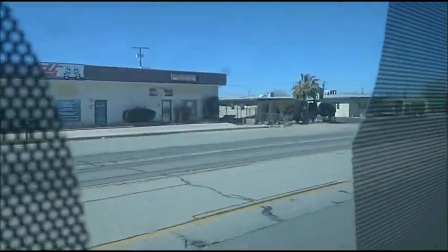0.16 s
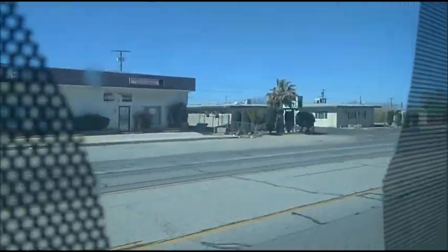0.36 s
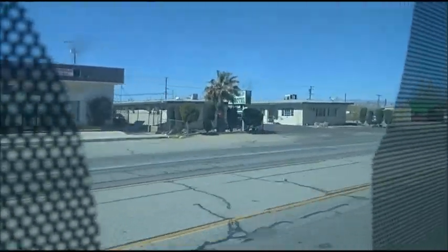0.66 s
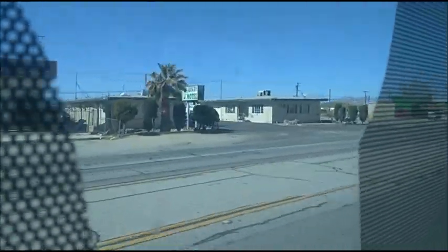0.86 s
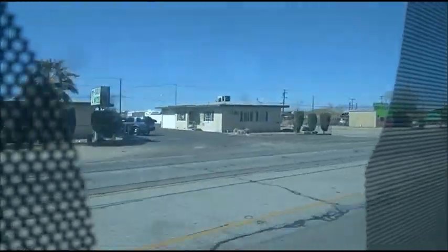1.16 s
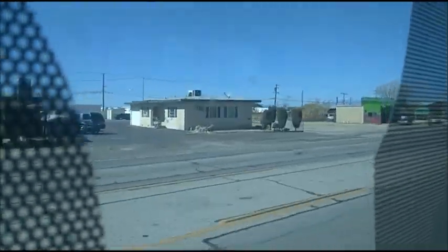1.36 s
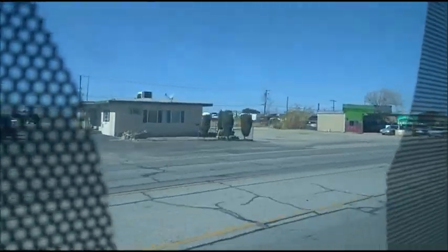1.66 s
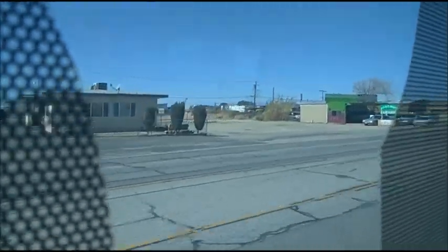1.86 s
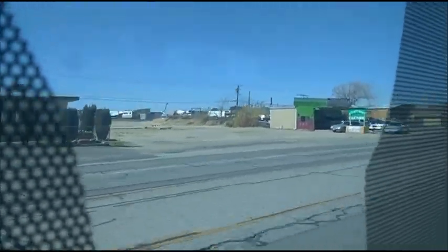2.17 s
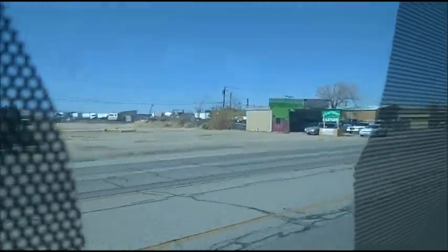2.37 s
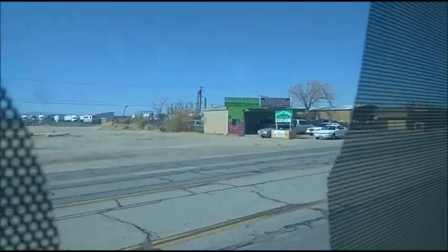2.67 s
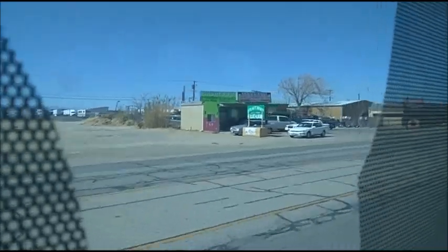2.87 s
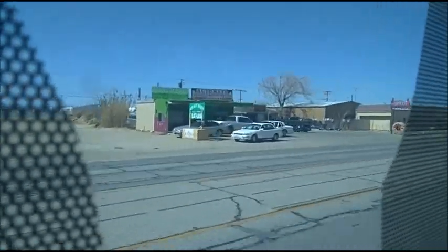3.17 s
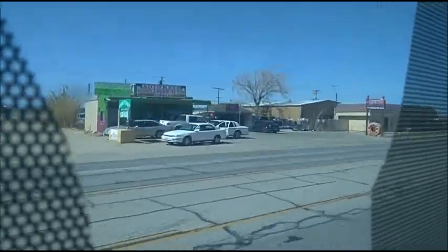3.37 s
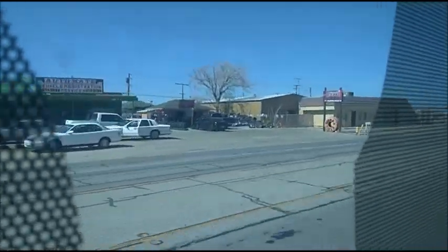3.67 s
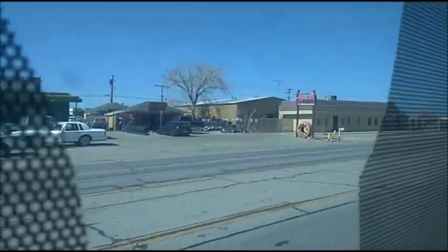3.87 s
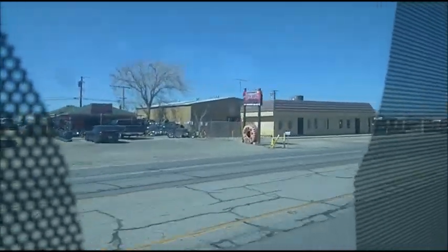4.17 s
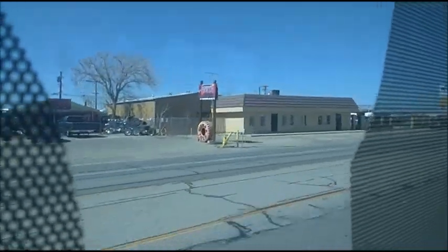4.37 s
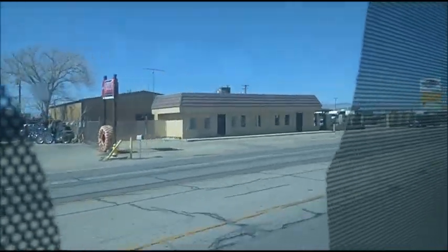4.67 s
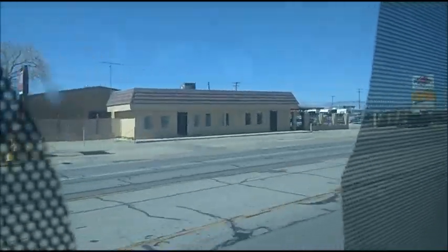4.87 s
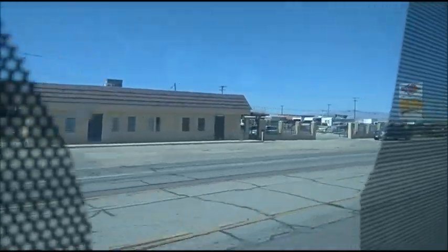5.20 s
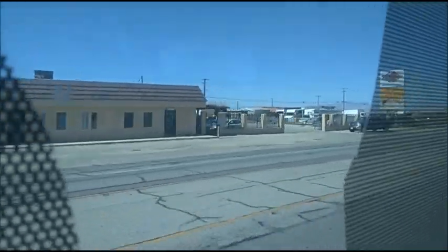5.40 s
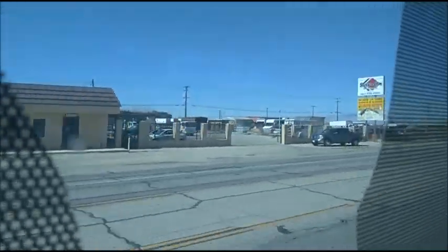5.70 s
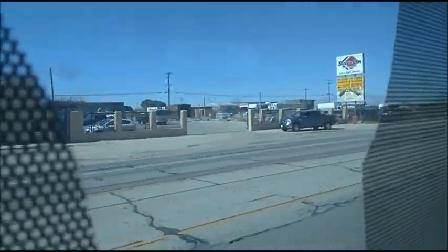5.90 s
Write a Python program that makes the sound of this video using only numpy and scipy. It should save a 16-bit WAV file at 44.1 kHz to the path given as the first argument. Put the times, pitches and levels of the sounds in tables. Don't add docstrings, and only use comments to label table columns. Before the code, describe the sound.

Steady tyre rumble and rising electric motor whine inside a moving bus, with booming bumps, rattling panels and a few sharp plastic snaps.

```python
import sys
import numpy as np
from scipy import signal
from scipy.fft import rfft, irfft, next_fast_len
from scipy.io import wavfile
from scipy.ndimage import uniform_filter1d

SR = 44100
rng = np.random.default_rng(int(sys.argv[2]) if len(sys.argv) > 2 else 0)


def pcm_store(signal):
    levels = np.round(np.clip(np.atleast_2d(signal), -1, 1) * 32767)
    wavfile.write(sys.argv[1], SR, levels.astype(np.int16).T)


def amplitude_ratio(level_db):
    exponent = np.asarray(level_db, float) / 20
    return 10 ** exponent


N = 266452
T = np.arange(N) / SR
COARSE = T[::32]


def boom():
    # time in seconds, level in dB.
    further_drops = [
        (.394, -33),
        (1.001, -26),
        (1.156, -35),
        (2.441, -22.5),
        (2.349, -30),
        (4.461, -35),
        (5.707, -22),
        (5.876, -25.5),
    ]
    pitch_hz = 68 * (1 + 0.076 * drift(30.0))
    phase = 2 * np.pi * np.cumsum(pitch_hz) / SR
    further = np.interp(T, COARSE, sum(amplitude_ratio(db) * hump(s, length=0.045) for s, db in further_drops))
    level = np.hypot(jolts(axis=1, floor_db=-38), further) * amplitude_ratio(9)
    near = np.sin(phase)
    far = amplitude_ratio(0.8) * np.sin(phase - 0.1)
    return level * np.array([near, far])


def tyres():
    # frequency in Hz, level in dB per Hz.
    rumble_spectrum = [(25, -54), (40, -99), (55, -37), (70, -49.5), (90, -42.5), (140, -48), (200, -48),
                       (250, -54), (300, -68), (450, -64.5)]
    roar_spectrum = [(300, -59.5), (450, -66), (600, -68.5), (750, -62.5), (850, -70.5), (1100, -72),
                     (1400, -76.5), (1750, -76), (2100, -83.5), (2800, -79.5), (3300, -83), (3700, -93),
                     (4200, -88.5)]
    fizz_spectrum = [(3700, -88.5), (4200, -97.5), (4800, -85.5), (5400, -91), (6500, -90.5), (7200, -92.5),
                     (8400, -93.5), (10000, -99.5), (11200, -102.5), (12500, -105.5), (14000, -111)]
    # time in seconds, level in dB.
    road_curve = [(0, -2), (.3, -2), (.6, 0.5), (.95, 0.5), (1.2, 2.5), (1.6, 2), (2.05, 1.5), (2.3, 0.5),
                  (2.6, 1), (3.0, 2), (3.3, -1), (3.65, 1.5), (4.1, 0.5), (4.5, 0), (4.8, 3), (5.1, -1),
                  (5.45, 0), (6.04, 1.5)]
    # start in seconds, peak in dB.
    shakes = [(5.877, -39), (0.3067, -54), (0.5352, -47), (0.657, -47), (0.819, -51), (0.8834, -48),
              (1.0894, -57), (1.1354, -50), (1.7619, -55), (2.1844, -50), (2.2233, -46), (3.0364, -46),
              (3.1083, -54), (3.2759, -55), (3.3473, -49), (3.7848, -47), (3.9236, -44), (4.0058, -44),
              (4.2278, -61), (4.4164, -48), (4.9327, -51), (5.2295, -56), (5.6326, -44), (5.7613, -45),
              (5.8232, -42), (6.0067, -46)]
    # time in seconds, rise over rest in dB, length in seconds.
    fizz_swells = [(.072, 6, .03), (.39, 6, 0.013), (.67, -2, .03), (.92, 1, 0.025), (1.13, 2.5, 0.1),
                   (1.55, 1.5, .06), (1.68, 6.5, 0.067), (1.9, -1, .1), (2.08, 3.5, 0.052), (2.2, 3, .03),
                   (2.49, 3, 0.072), (2.57, 4.5, 0.041), (2.75, 5, 0.062), (2.99, 4, .04), (3.8, 3.5, .03),
                   (3.91, 5.5, 0.07), (4.23, 4, 0.061), (4.34, 4, .02), (4.43, 5, 0.037), (4.56, 5.5, 0.11),
                   (4.72, 2, 0.057), (4.84, 6.5, 0.17), (5.07, 3, 0.017), (5.26, 2, 0.033), (5.62, -2, .03),
                   (5.8, 3.5, 0.074), (6.0, 4.5, 0.068)]

    road = amplitude_ratio(curve(road_curve, T, axis=1))
    rumble = port_noise(rumble_spectrum, size=2048, skirt_db=34, patchy_db=0.87, flicker_db=-0.35)
    rumble = rumble * jolts(axis=2, floor_db=-3.5) ** 0.43 * road ** 0.75 * amplitude_ratio(3.5)
    roar = port_noise(roar_spectrum, size=1024, skirt_db=31, patchy_db=1.45, flicker_db=-0.22)
    roar = roar * road * amplitude_ratio(2.5)

    fizz = port_noise(fizz_spectrum, size=256, skirt_db=26, patchy_db=1.25, flicker_db=1.2)
    shaken = np.zeros(N)
    for s, db in shakes:
        age = np.maximum(T - s, 0)
        attack = np.minimum(age / 0.0021, 1)
        shaken += amplitude_ratio(db + 50.5 - 60 * age / 0.13) * attack
    swelled = amplitude_ratio(swelling(fizz_swells) - 1.5)
    fizz = fizz * (swelled + 0.63 * shaken) * road ** 0.34 * amplitude_ratio(3.0)
    return rumble + roar + fizz


def motor():
    # time in seconds, pitch in Hz.
    mesh_pitch = [(0, 653), (.75, 659.7), (1.5, 666), (2.25, 672.5), (3, 676.6), (3.75, 679.9),
                  (4.5, 685.5), (5.25, 691.6), (6.04, 698.1)]
    orders = [.8356, 1, 1.8848, 2.5637, 3.9201, 4.8126, 7.1029, 8.3687, 10.0307]
    # steady level in dB, far microphone level in dB, far microphone lag in radians,
    # share of the load it follows.
    whines = [(-49, -4.5, 0.16, .1), (-41.5, 0, 0.38, 1), (-59.5, -10.5, .1, 0.3), (-59.5, -25, 2.1, 0.13),
              (-69, -4, .1, .1), (-61, -7.5, 0.092, .3), (-66, -5, .1, .1), (-77.5, 7.5, .1, .1),
              (-69, -8, .1, .1)]
    # time in seconds, level in dB.
    effort = [(0, -0.5), (.5, 4), (1.2, 4), (1.6, 4), (2.0, -0.5), (2.8, 3.5), (3.6, 0.5), (4.4, 1),
              (5.2, -2.5), (5.65, -0.5), (5.8, -7), (6.04, -4)]
    # time in seconds, rise in dB,
    # length in seconds.
    whine_swells = [
        [(2.6, 5, .15), (4.0, 3, .2), (4.9, 9.5, 0.39)],
        [],
        [],
        [(.85, 11, 0.6), (1.9, 5, 0.17), (2.6, 6, .15), (3.15, 8.5, 0.37), (5.1, 2, .15)],
        [(.45, 8, .1), (1.75, 15, .08), (3.1, 6, .06), (4.95, 14, .1)],
        [(.4, -3, .15), (.88, 7.5, 0.17), (1.53, 10, .13), (3.6, 2, 0.13), (4.25, 5, .1), (4.5, 3, .06),
         (5.25, 8, 0.21)],
        [(.85, 5, .1), (1.35, 5, .1), (3.15, 4, .1), (3.85, 6, .08)],
        [(1.45, 1, .08), (3.0, 8, .12), (5.3, 6, .15)],
        [(.3, -3, .1), (1.2, 6, .1), (1.95, 8, .1), (5.5, 4, .08)],
    ]
    mesh_hz = curve(mesh_pitch, T, axis=1)
    load_db = curve(effort, T, axis=1)
    out = np.zeros((2, N))
    for order, swells, (db, far_db, lag, share) in zip(orders, whine_swells, whines):
        pitch_hz = order * mesh_hz * (1 + 0.0013 * drift(25.0))
        phase = 2 * np.pi * np.cumsum(pitch_hz) / SR
        level = np.sqrt(2) * amplitude_ratio(db + share * load_db + swelling(swells) + 1.6 * drift(60.0))
        out += level * np.array([np.sin(phase), amplitude_ratio(far_db) * np.sin(phase - lag)])
    return out


def ticks():
    # time in seconds, peak in dB, brightness in dB an octave, late rebound in dB.
    snaps = [
        (0.1389, -24, 3, -13),
        (5.6628, -24, 3.5, -30),
        (5.8756, -24.5, 3, -30),
        (5.9575, -35, 4, -12),
    ]
    # pitch in Hz, level in dB, time to fall 60 dB in seconds,
    # far microphone level in dB.
    modes = [(2900, -1, 0.006, 2), (3470, -3, 0.005, 4), (4470, -1, 0.004, -8), (6050, -6, 0.004, -11),
             (7920, -3, 0.0034, -6), (9600, -14, .003, -8), (11800, -23, .004, -10.5),
             (13600, -31, .004, -8.1)]
    t = T[:900]
    attack = np.sin(np.pi / 2 * np.minimum(t / 0.0002, 1)) ** 2
    out = np.zeros((2, N))
    for s, db, bright_db, rebound_db in snaps:
        # delay in seconds, level in dB
        for late_s, late_db in ((0.0009, -4), (0.0016, 0), (0.0040, -10), (0.015, rebound_db)):
            at = round((s + late_s) * SR)
            for hz, mode_db, t60, far_db in modes:
                phase = 2 * np.pi * (hz * rng.uniform(1.0, 1.03) * t - rng.random((2, 1)))
                level_db = db + late_db + mode_db + bright_db * np.log2(hz / 4000)
                level_db = level_db + np.array([[1.5], [1.5 + far_db]])
                out[:, at:at + len(t)] += amplitude_ratio(level_db - 60 * t / t60) * attack * np.sin(phase)
    return out


def squeaks():
    # start in seconds, level in dB, pitch in Hz, time to fall 60 dB in seconds.
    slips = [
        (.43, -66, 12800, .15),
        (2.06, -63, 12700, .25),
        (4.685, -58, 11300, 0.2),
        (4.69, -62, 12300, .5),
        (4.72, -62, 10500, .5),
        (4.76, -64, 13000, .5),
    ]
    t = T[:9000]
    out = np.zeros((2, N))
    lowpass = signal.butter(4, 250, fs=SR, output="sos")
    for s, db, hz, t60 in slips:
        rough = evened(signal.sosfilt(lowpass, rng.standard_normal((2, len(t)))))
        ring = rough[0] * np.sin(2 * np.pi * hz * t) + rough[1] * np.cos(2 * np.pi * hz * t)
        level = amplitude_ratio(db - 60 * t / t60) * np.minimum(t / 0.004, 1)
        at = round(s * SR)
        out[:, at:at + len(t)] += level * ring * amplitude_ratio(np.array([[0], [-11.0]]))
    return out


def jolts(axis, floor_db):
    # time in seconds, boom in dB, rumble over the road in dB,
    # length in seconds.
    bumps = [(.117, -25, 3, 0.066), (0.284, -26, 8.5, .035), (0.492, -22, -13, 0.036),
             (0.673, -26, 7.5, 0.033), (0.833, -29, 3, 0.02), (1.086, -26, 3.5, 0.02),
             (1.243, -30, 9, 0.019), (1.542, -28.5, -8, .03), (1.627, -17, 9, 0.033),
             (1.935, -27, 4, 0.037), (2.102, -16, 7.5, 0.03), (2.25, -18.5, 2.5, 0.023),
             (2.597, -19, 8, 0.03), (2.838, -23, -3, 0.03), (2.96, -23, -4, 0.04), (3.062, -23, -2, 0.0085),
             (3.196, -22.5, 5.5, 0.034), (3.36, -25, -19, .04), (3.517, -26, 0, 0.02),
             (3.656, -22, 6, 0.025), (3.915, -18.5, 7.5, 0.034), (4.147, -26, -2, .026),
             (4.253, -22.5, 6.5, 0.031), (4.554, -22, 3, 0.023), (4.748, -24, -14, 0.028),
             (4.908, -24, -18, 0.02), (5.046, -26, 4, 0.053), (5.273, -41, 2.5, .055),
             (5.478, -22, 0, 0.015), (5.653, -22, -15, 0.015)]
    power = sum((amplitude_ratio(row[axis]) * hump(row[0], row[3], rise=1, fall=2)) ** 2 for row in bumps)
    return np.interp(T, COARSE, np.sqrt(power + amplitude_ratio(floor_db) ** 2))


def port_noise(spectrum, size, skirt_db, patchy_db, flicker_db):
    # frequency in Hz, far level in dB, likeness from -1 to 1,
    # far lag in radians.
    ports = [(40, -0.5, 0.93, .1), (127, 1.5, 1, 0.36), (189, -0.2, 0.96, 0.1), (318, 0.5, 0.68, 0.86),
             (440, -4, 0.76, 0.25), (582, 7, 0.65, 0.41), (835, -4.5, -0.03, 1), (917, -0.2, 0.45, .01),
             (1600, -2, -0.52, 0.47), (2320, 0, 0.21, .01), (3000, -6.5, -0.16, .01),
             (5500, -6, -0.038, .01), (9800, -10.5, 0.1, 0.0092), (13900, -33, -0.32, .01)]
    hop = size // 4
    hz = np.fft.rfftfreq(size, 1 / SR)
    a, b, c, d, patches = rng.standard_normal((N // hop + 5, len(hz), 5)).T
    patches = evened(uniform_filter1d(uniform_filter1d(patches, 8, 0), 8, 1))
    flicker = evened(uniform_filter1d(rng.standard_normal(a.shape[1]), 4))

    like = np.clip(read(ports, hz, axis=2), -1, 1)[:, None]
    lag = np.exp(-1j * read(ports, hz, axis=3))[:, None]
    near = a + 1j * b
    far = like * near * lag + np.sqrt(1 - like ** 2) * (c + 1j * d)
    far = far * amplitude_ratio(read(ports, hz))[:, None]

    octaves_out = abs(np.log2(np.clip(hz, spectrum[0][0], spectrum[-1][0]) / (hz + 1)))
    shape_db = read(spectrum, hz) - skirt_db * octaves_out - 100 * (hz > 14200)
    level_db = shape_db[:, None] + patchy_db * patches + flicker_db * flicker
    z = np.array([near, far]) * amplitude_ratio(level_db)
    z = z * np.sqrt(SR / size * 0.27)
    return signal.istft(z, nperseg=size, noverlap=size - hop)[1][:, :N] * 2


def hump(s, length, rise=0.83, fall=0.63):
    width = max(length, 0.005) * np.where(COARSE < s, rise, fall)
    return np.exp(-((COARSE - s) / width) ** 2)


def swelling(rows):
    bells = (db * hump(s, length) for s, db, length in rows)
    return np.interp(T, COARSE, sum(bells, 0 * COARSE))


def drift(rate_hz):
    rates = np.geomspace(rate_hz / 12, rate_hz, 10)
    return evened(sum(np.sin(2 * np.pi * (f * T + rng.random())) / np.sqrt(f) for f in rates))


def evened(x):
    return x / np.sqrt(np.mean(x ** 2) + 1e-20)


def read(table, hz, axis=1):
    rows = np.array(table)
    return np.interp(np.log(hz + 1), np.log(rows[:, 0] + 1), rows[:, axis])


def curve(table, t, axis):
    rows = np.array(table)
    return np.interp(t, rows[:, 0], rows[:, axis])


def ducking():
    # time in seconds, depth in dB.
    hard_bumps = [
        (.15, 2),
        (.69, 4),
        (1.606, 9),
        (2.11, 4),
        (2.6, 2.5),
        (3.68, 3.5),
        (3.93, 3.5),
        (4.27, 0.5),
        (5.665, 5),
    ]
    down_db = np.zeros(N)
    for s, db in hard_bumps:
        age = np.maximum(T - s, 0)
        down_db += db * (1 - np.exp(-age / 0.012)) * np.exp(-age / 0.53)
    return amplitude_ratio(1 - down_db)


def widened(x):
    # frequency in Hz, share of the other microphone.
    cross_share = [(100, 0.66), (4000, 0.61), (5200, 0.25), (6500, 0.39), (8000, .15), (10000, 0.038)]
    size = next_fast_len(N + 4096)
    hz = np.fft.rfftfreq(size, 1 / SR)
    z = rfft(x, size)
    delay = np.exp(-2j * np.pi * hz / 2140)
    wide = z - np.clip(read(cross_share, hz), 0, 1) * delay * z[::-1]
    wide = wide / (1 + (hz / 14900) ** 40)
    return irfft(wide, size)[:, :N]


def scene():
    return boom() + tyres() + motor() + squeaks() + ticks()


def top_cut(x):
    return signal.sosfilt(signal.butter(12, 15500, fs=SR, output="sos"), x)


def record(dry):
    finished = widened(dry * ducking())
    return top_cut(finished)


dry = scene()
out = record(dry)
pcm_store(out)
```